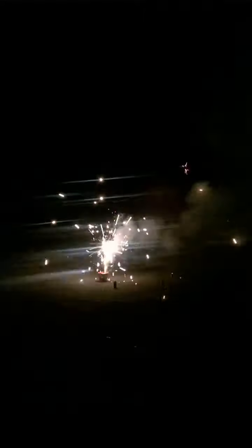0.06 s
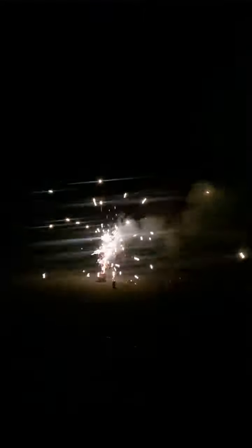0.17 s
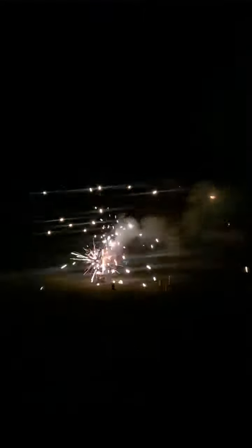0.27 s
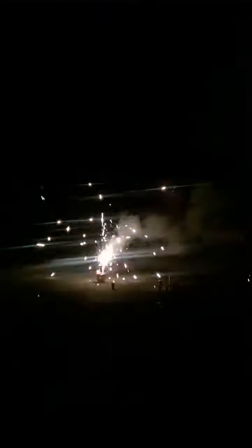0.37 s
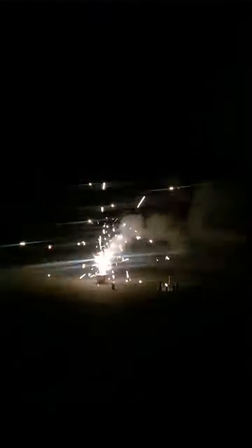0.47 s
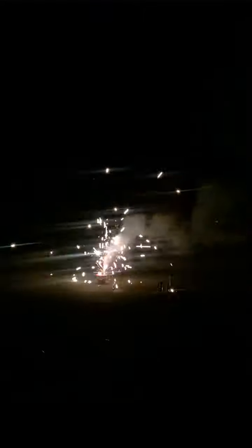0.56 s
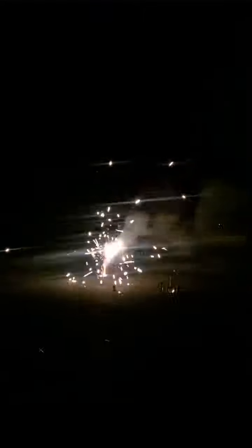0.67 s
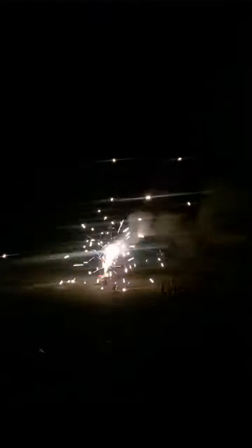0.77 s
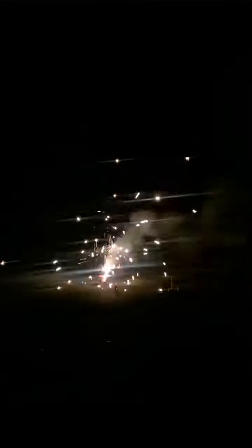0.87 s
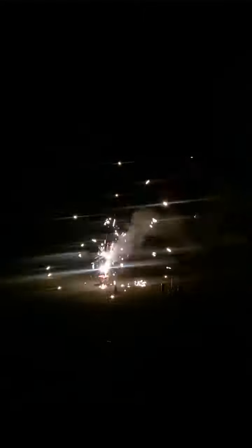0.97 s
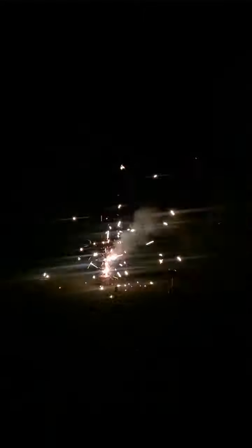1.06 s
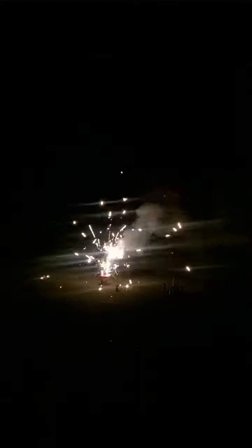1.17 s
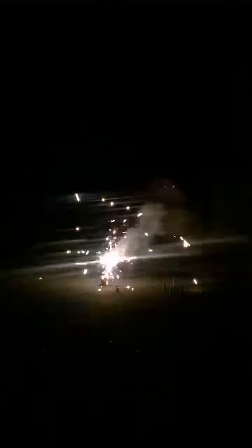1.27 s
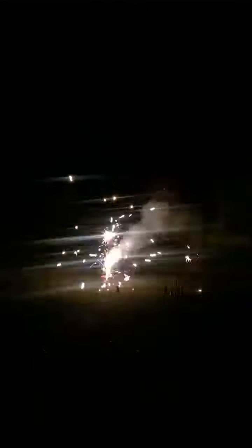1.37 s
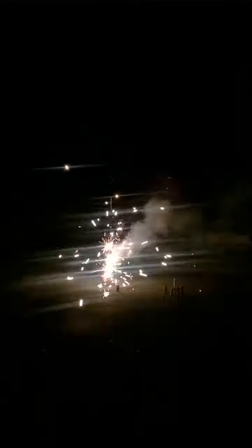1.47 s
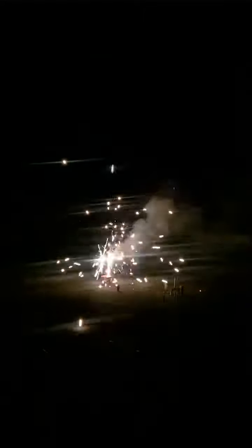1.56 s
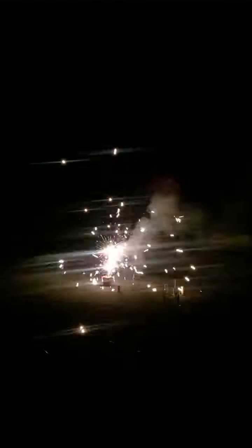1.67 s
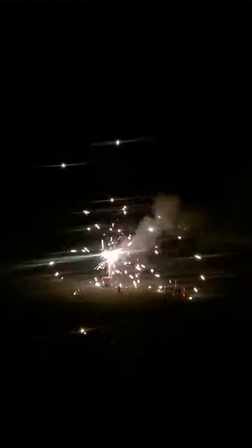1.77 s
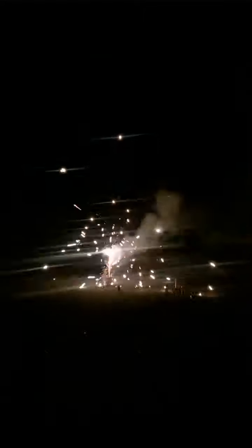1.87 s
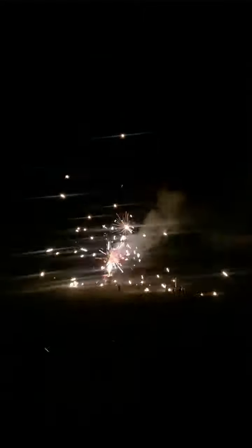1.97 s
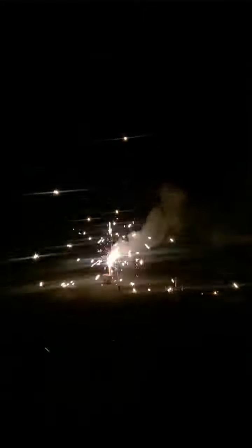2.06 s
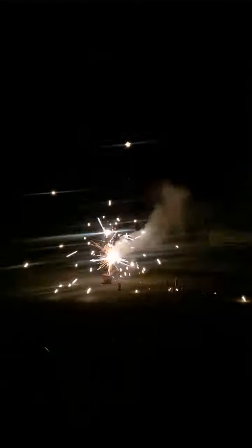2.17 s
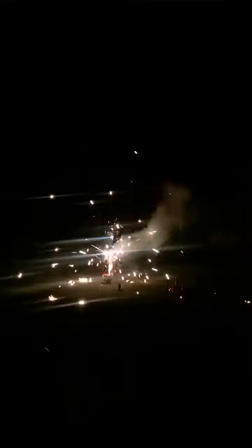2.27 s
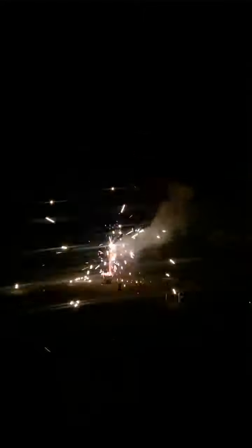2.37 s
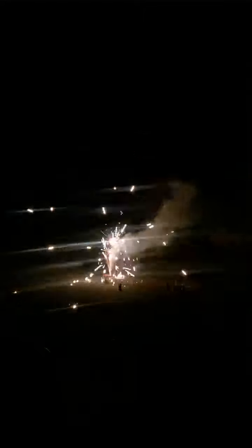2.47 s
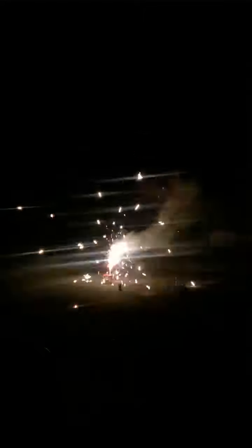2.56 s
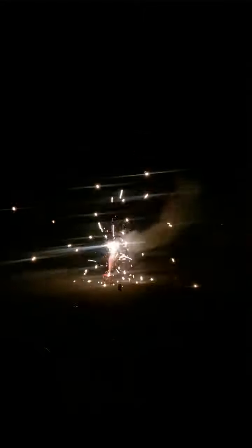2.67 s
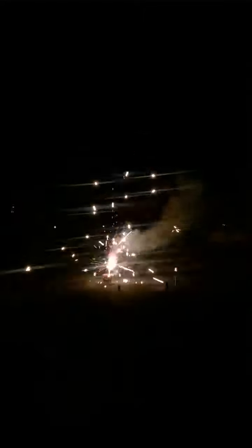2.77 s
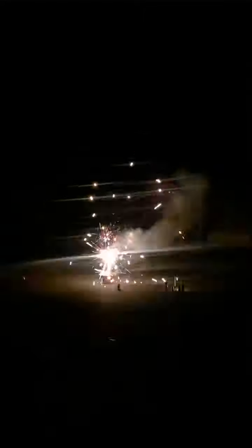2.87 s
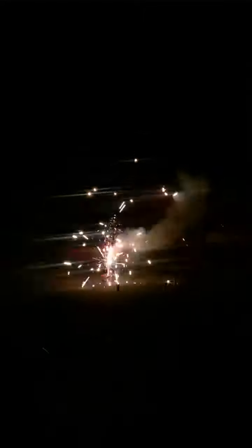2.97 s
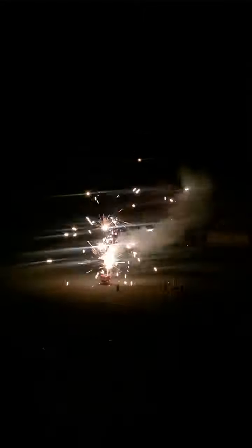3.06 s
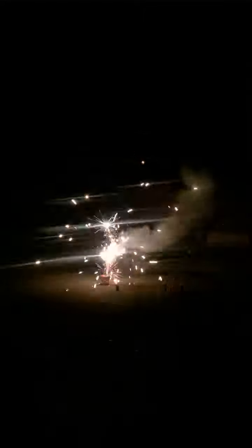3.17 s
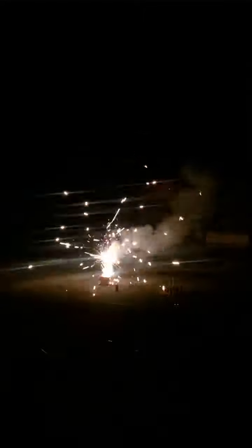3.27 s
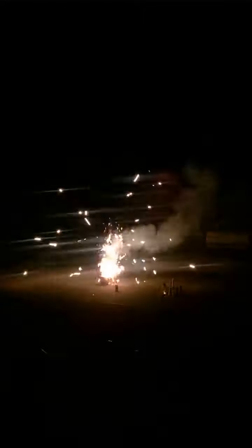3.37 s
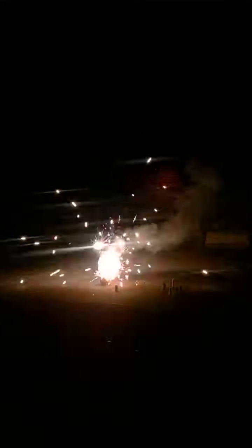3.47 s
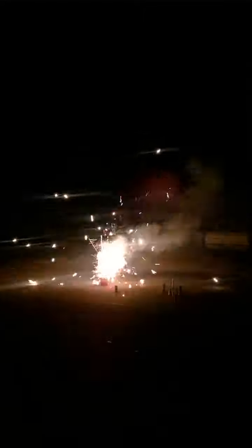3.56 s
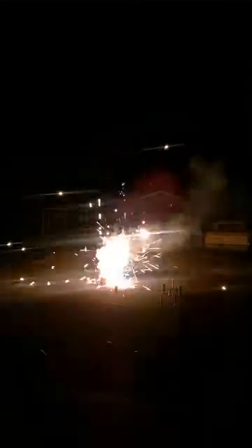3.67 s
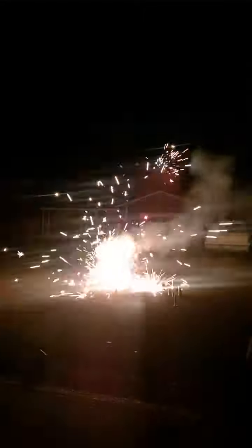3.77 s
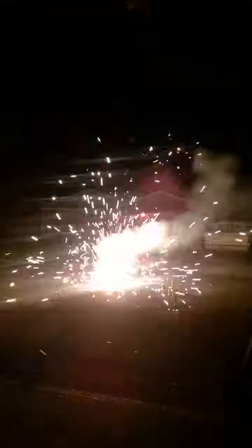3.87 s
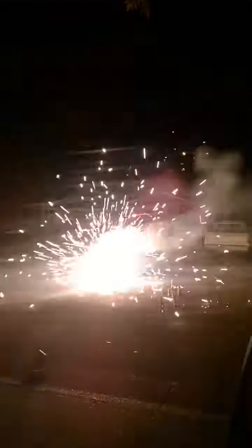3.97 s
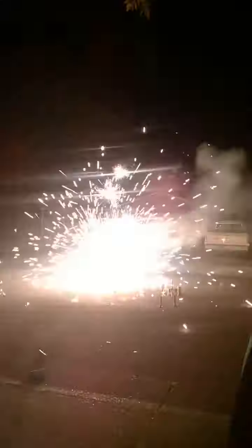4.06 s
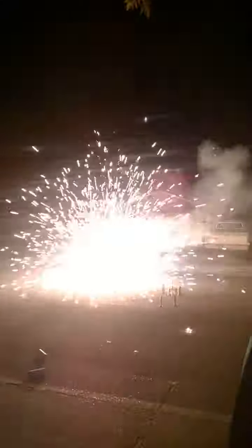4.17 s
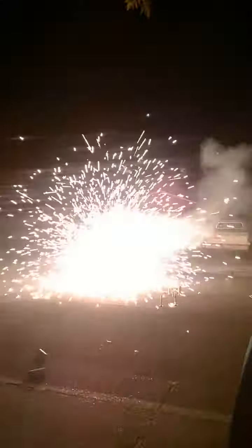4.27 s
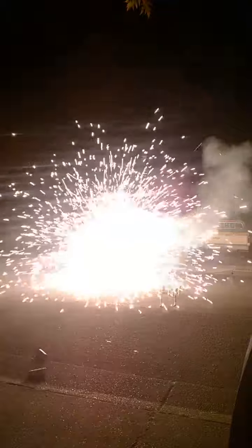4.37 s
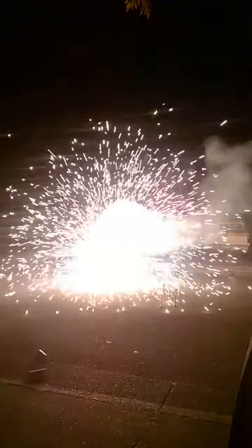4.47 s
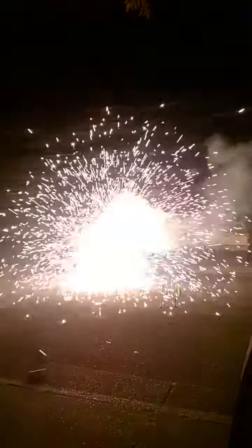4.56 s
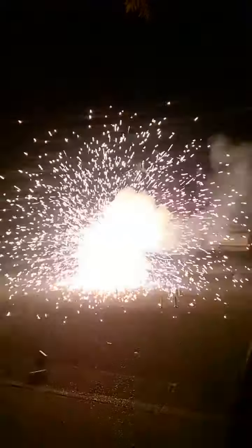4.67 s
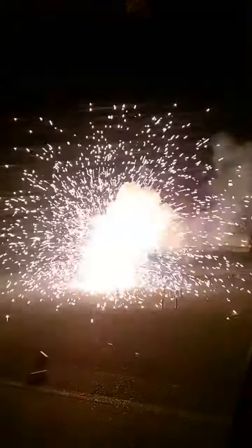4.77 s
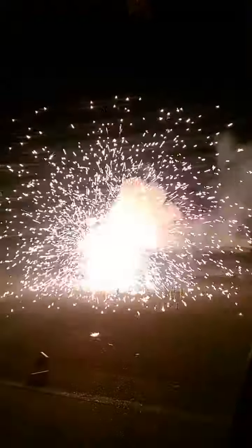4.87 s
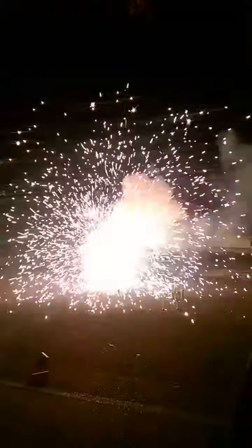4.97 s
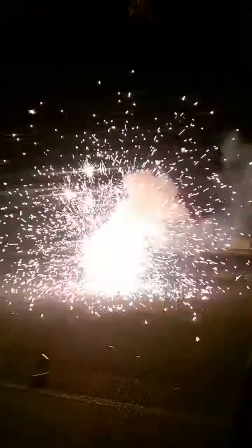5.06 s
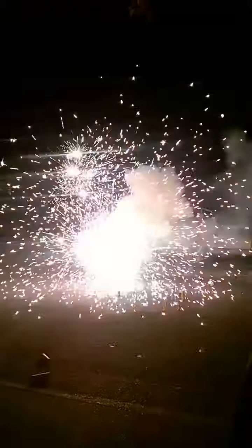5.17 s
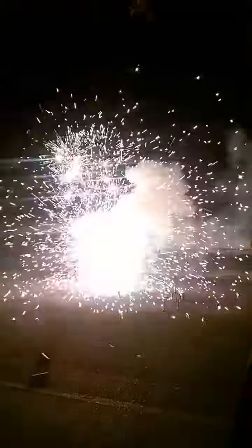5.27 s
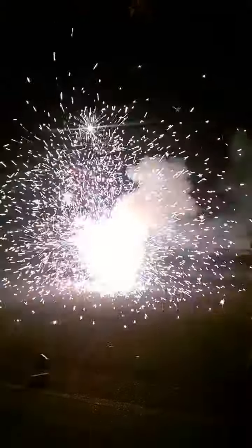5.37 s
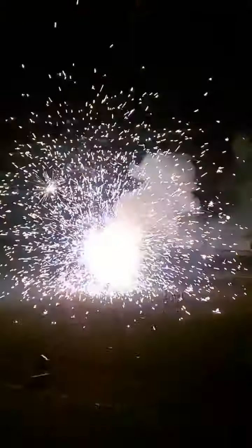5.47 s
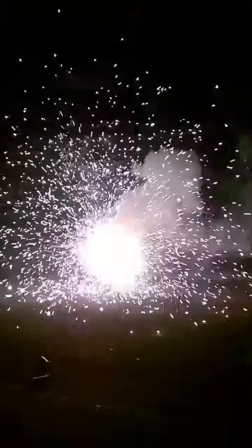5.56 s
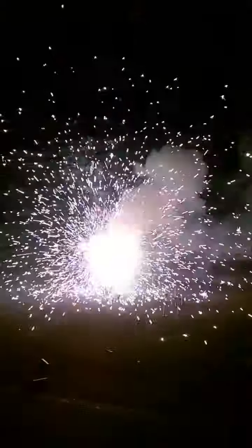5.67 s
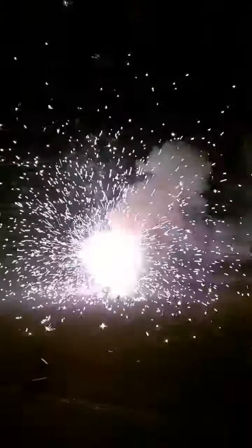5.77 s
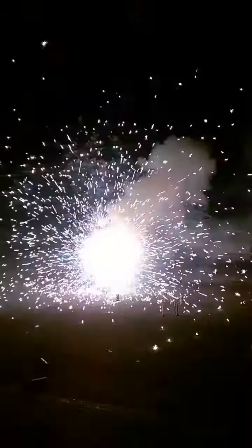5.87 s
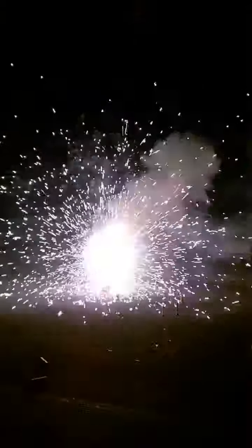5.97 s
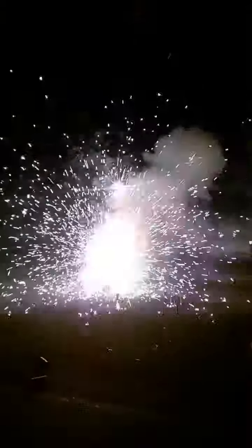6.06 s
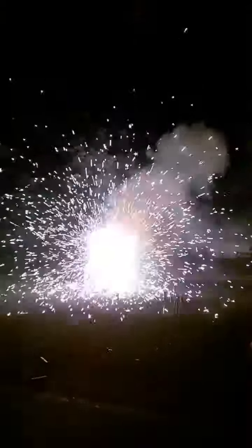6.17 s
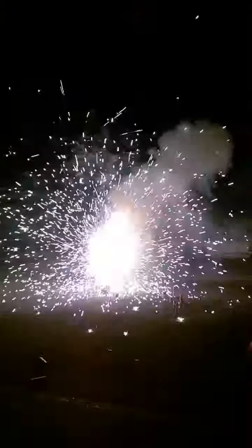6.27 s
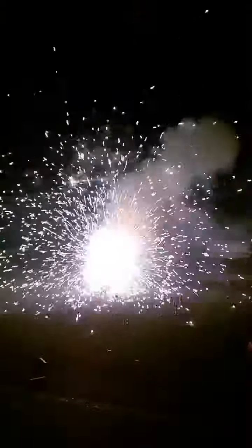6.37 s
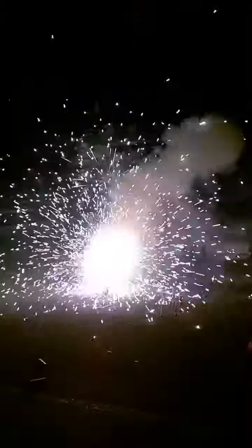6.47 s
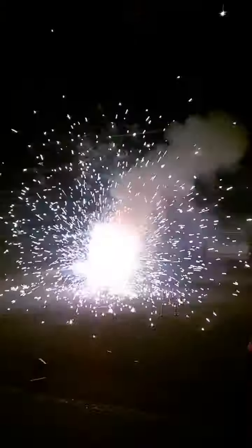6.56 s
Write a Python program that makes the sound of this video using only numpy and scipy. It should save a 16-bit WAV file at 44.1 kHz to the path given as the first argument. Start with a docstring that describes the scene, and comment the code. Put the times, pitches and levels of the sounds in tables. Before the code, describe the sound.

Sharp resonant spark cracks snap in an open paved yard, one dull distant thump early, before erupting into continuous, bright, hissing crackle.

```python
"""A paved yard at night, where a ground fountain firework burns some metres away.
Its sparks burst in dry, resonant pops: first sputtering, then a dense crackling shower over the rush of the jet.
How hard the powder burns sets the number and size of the small sparks and the strength of the noise jet.
Smaller pops and weaker burning are brighter; each pop has a short treble splash and scatters as hissing noise.
One dull, resonant thump with two echoes comes from farther off, over a low rumble of open air."""
import sys
import numpy as np
from scipy import signal
from scipy.fft import rfft, irfft
from scipy.io import wavfile
from scipy.ndimage import uniform_filter1d

SR = 44100
rng = np.random.default_rng(int(sys.argv[2]) if len(sys.argv) > 2 else 0)


def int16_out(signal):
    """Quantize to a 16-bit WAV file."""
    q = np.round(np.clip(np.atleast_2d(signal).T, -1, 1) * 32767)
    wavfile.write(sys.argv[1], SR, q.astype(np.int16))


N = 291942
T = np.arange(N) / SR
POP_S = 0.003   # length over which a pop's level counts
KNOCK_SPREAD_DB = 1.7   # chance spread of the knock in small sparks and fragments


def from_db(db):
    """Decibels to gain."""
    return 10 ** (np.asarray(db) / 20)


def unit_energy(x):
    """Scale so that the squares sum to one."""
    return x / np.sqrt(np.sum(x ** 2) + 1e-20)


def through(x, response):
    """Pass a sound through an impulse response."""
    return signal.oaconvolve(x, response)[:N]


def clicks(times, sizes):
    """One impulse of each size at its time."""
    samples = np.clip(times * SR, 0, N).astype(int)
    return np.bincount(samples, sizes, N + 1)[:N]


def noise(spectrum, size):
    """Noise of rms 1 with a given spectrum, rolled off below its first frequency."""
    hz, level_db = np.transpose(spectrum)
    bins = np.maximum(np.fft.rfftfreq(size, 1 / SR), 1)
    gain = from_db(np.interp(np.log(bins), np.log(hz), level_db))
    gain = gain * np.minimum(bins / hz[0], 1)
    shaped = irfft(rfft(rng.standard_normal(size)) * gain, size)
    return unit_energy(shaped) * np.sqrt(size)


def resonances(modes, size, pitch=1):
    """Impulse response of parallel resonances with alternating signs, all shifted by a pitch ratio."""
    out, impulse = 0, signal.unit_impulse(size)
    for k, (hz, width_hz, level_db) in enumerate(modes):
        radius = np.exp(-np.pi * width_hz / SR)   # a wider resonance dies faster
        angle = 2 * np.pi * hz * pitch / SR
        ring = signal.lfilter([1, 0, -1], [1, -2 * radius * np.cos(angle), radius ** 2], impulse)
        out = out + (-1) ** k * from_db(level_db) * (1 - radius ** 2) * ring
    return unit_energy(out)


def diffuse(times, sizes, power_shape, spectrum):
    """Every spark bursts at a new place, so each scatters into fresh noise under the same power envelope."""
    power = through(clicks(times, sizes ** 2), power_shape / power_shape.sum())
    return np.sqrt(np.maximum(power, 0)) * noise(spectrum, size=N)


def vigour(times):
    """How hard the powder burns at these times, in dB against full spray."""
    # how hard the powder burns, as the level of the fine crackle: (time [s], level [dB])
    burn_curve = [(0.0, -38), (0.37, -40), (1.01, -35), (2.04, -37), (2.34, -34), (2.73, -37),
                  (3.24, -33.5), (3.63, -36), (3.72, -33.5), (3.93, -21), (4.07, -18.5), (4.31, -18),
                  (4.81, -17.5), (5.22, -17.5), (5.49, -17.5), (6.62, -19.5)]
    full_burn_db = -18   # the fountain in full spray
    s, level_db = np.transpose(burn_curve)
    return np.interp(times, s, level_db) - full_burn_db


def night_air(level_db):
    """Steady noise makes the low rumble of the open air."""
    # spectrum of the rumble: (frequency [Hz], relative density [dB])
    rumble_spectrum = [(30, -17), (90, -1), (200, -1.5), (800, -21), (6000, -55)]
    return from_db(level_db) * noise(rumble_spectrum, size=N)


def thump(top_hz, tail_db, tail_t60):
    """A far, muffled report with two echoes and a short tail; distance has taken its treble."""
    # the dull thump and its echoes: (time [s], level [dB])
    arrivals = [(0.312, -8), (0.3428, -19), (0.3766, -27)]
    # what the thump rings with: (frequency [Hz], width [Hz], level [dB])
    thump_modes = [(158, 59, 2), (297, 200, -4), (440, 72, 0), (635, 83, -6)]
    s, level_db = np.transpose(arrivals)
    muffle = signal.butter(8, top_hz, fs=SR, output="sos")
    boom = signal.sosfilt(muffle, resonances(thump_modes, size=8192))
    direct = through(clicks(s, from_db(level_db)), boom / np.abs(boom).max())
    tail = unit_energy(rng.standard_normal(SR) * from_db(-60 * T[:SR] / tail_t60))
    return direct + from_db(tail_db) * through(direct, tail)


def jet(flutter_db):
    """Gas rushes from the tube as noise and flutters as the powder burns."""
    # spectrum of the rushing gas: (frequency [Hz], relative density [dB])
    rush_spectrum = [(25, -57), (50, -14), (80, -11), (150, -2), (300, -2), (600, -9.5), (1500, -30),
                     (4000, -3), (7000, -5), (15500, -48)]
    full_burn_jet_db, follows = -27.5, 0.99   # level before flutter; dB gained per dB of burn
    flutter = noise([(2, 0), (20, -3), (60, -18), (300, -70)], size=N)
    level_db = full_burn_jet_db + follows * vigour(T) + flutter_db * flutter
    return from_db(level_db) * noise(rush_spectrum, size=N)


def yard(times, sizes, spectrum, build_s, t60, far_db, far_t60, grain_db):
    """Ground, walls and leaves return a finely grained tail: a quick build, a fast decay and a weaker slow one."""
    age = T[:SR]
    fade = np.hypot(from_db(-60 * age / t60), from_db(far_db - 60 * age / far_t60))
    build = 1 - np.exp(-age / build_s)
    grain = noise([(30, 0), (600, 0), (3000, -40)], size=N)
    return diffuse(times, sizes, (fade * build) ** 2, spectrum) * from_db(grain_db * grain)


def scattered_cracks(times, crack):
    """The yard returns the body of the cracks almost at once, with a longer faint tail."""
    # spectrum of the scattered cracks: (frequency [Hz], relative density [dB])
    scatter_spectrum = [(60, -18), (160, -4), (330, -3), (500, -3), (870, -2), (1210, -5.5), (1400, 0),
                        (1660, 4), (2020, -3), (2450, 1), (3150, -0.5), (3700, -4), (5000, -33.5)]
    return yard(times, crack, scatter_spectrum, build_s=0.00014, t60=0.19,
                far_db=-9.5, far_t60=0.9, grain_db=2.5)


def scattered_treble(times, treble):
    """The yard returns the treble as a bright hiss that swells more slowly than the scattered cracks."""
    # spectrum of the scattered treble: (frequency [Hz], relative density [dB])
    sizzle_spectrum = [(1500, -40), (2600, -30), (3700, -5), (4600, -1.5), (5400, 1), (7200, 0), (8800, -3),
                       (10200, -9.5), (12500, -14.5), (15500, -29)]
    return yard(times, treble, sizzle_spectrum, build_s=0.015, t60=0.21,
                far_db=-40, far_t60=0.68, grain_db=-0.2)


def splash(times, treble, delay_s, spread):
    """A short splash of treble noise follows each crack by a millisecond or two."""
    # spectrum of the treble splash: (frequency [Hz], relative density [dB])
    splash_spectrum = [(2500, -11.5), (3700, -10.5), (4600, -1.5), (5500, -2), (7200, 2.5), (8800, -2.5),
                       (10200, -8.5), (12500, -18.5), (15500, -38)]
    swell = np.exp(-(np.log(T[1:SR // 50] / delay_s) / spread) ** 2 / 2)
    return diffuse(times, treble, swell, splash_spectrum)


def small_sparks():
    """Times, sizes and knocks of the small pops: random, and more and louder the harder the powder burns."""
    swarm_per_s, swarm_db = 680, -19   # rate and joint size at full burn, before the pops are coloured
    rate_follows, swarm_follows = 0.9, 1.505   # dB that each gains per dB of burn
    size_spread_db, surge_db = 3, 0.16   # differences in size; slow surges of the spray
    knock_db = 3.5   # middle of the knock lift
    chance, burn_db = rng.random(N), vigour(T)
    size_luck, knock_luck = rng.standard_normal((2, N))
    surge = noise([(2, 0), (8, 0), (30, -40), (300, -120)], size=N)
    per_s = swarm_per_s * from_db(rate_follows * burn_db)
    born = chance < per_s / SR
    size = born * from_db(size_spread_db * np.minimum(size_luck, 2))
    # the powder burns evenly, so the power is steadied over a fortieth of a second
    power = uniform_filter1d(size ** 2, size=SR // 40)
    evened = size / np.sqrt(np.maximum(power, per_s / SR))
    size = evened * from_db(swarm_db + swarm_follows * burn_db + surge_db * surge)
    return T[born], size[born], knock_db + KNOCK_SPREAD_DB * knock_luck[born]


def loud_sparks(gain_db):
    """Times, sizes and knocks of the big pops."""
    # the big sparks bursting, before the shared gain: (time [s], level [dB], knock lift [dB])
    big_pops = [(0.01, -24.5, 5.5), (0.0687, -30, 8.5), (0.0807, -23, 8), (0.0904, -32, 11),
                (0.1039, -20.5, 1), (0.1646, -23.5, 8), (0.1716, -26, 6), (0.2646, -29, 6.5),
                (0.331, -19.5, 1.5), (0.3417, -22, 0), (0.373, -25.5, 5), (0.45, -25, 1),
                (0.4621, -26.5, -12), (0.5583, -23.5, -3), (0.5664, -33.0, 12), (0.5799, -19.5, 6.5),
                (0.6013, -29.5, 5.5), (0.6701, -23, 8), (0.7028, -20.5, 4), (0.757, -23, 4),
                (0.7727, -29, 7), (0.8282, -27.0, 2), (0.8697, -27, 2.5), (0.8958, -24.5, 7.5),
                (0.9336, -25.5, 6), (0.9648, -32, 12), (0.9872, -21, 5.5), (1.0317, -24.5, 3),
                (1.0638, -25, 8.5), (1.0726, -24.5, 1), (1.1069, -24, 8), (1.1188, -16.5, 7.5),
                (1.126, -25.5, 5), (1.1707, -24, 1), (1.2292, -28, 6), (1.303, -24, 4.5), (1.313, -27, 1),
                (1.3468, -22.5, -14), (1.3618, -24.5, 0), (1.3721, -28, 9), (1.3808, -28, 9),
                (1.409, -24, 0), (1.4292, -28, 6), (1.4569, -28, -3), (1.4616, -25, 4), (1.491, -26.0, 2),
                (1.51, -25.0, 8), (1.549, -26, 7), (1.5531, -26, 8.5), (1.5853, -28, -9), (1.618, -33, 9),
                (1.6456, -23.5, 6.5), (1.734, -24, 0), (1.7522, -24, 6.5), (1.7605, -23, 8.5),
                (1.8127, -24, -8), (1.8307, -28, 3), (1.8656, -23.5, 6), (1.9166, -27.5, 9.5),
                (1.9394, -30, 8), (1.9627, -28.5, 6), (1.9964, -32.5, 3), (2.046, -32.5, 4),
                (2.0655, -41, 19), (2.0826, -28.5, 0), (2.1015, -27, 6), (2.136, -25, -6),
                (2.1483, -30.5, 12), (2.1824, -20.5, 5), (2.2095, -26, 7), (2.2397, -22.5, 7),
                (2.268, -28, 6), (2.3012, -19, 3), (2.3119, -23.5, 8), (2.3556, -25, 8), (2.3695, -24.5, 5),
                (2.3945, -21, 3), (2.414, -29.5, 1), (2.4888, -26.0, 6.5), (2.52, -30.5, 7),
                (2.553, -23.5, 7), (2.5727, -25, 2), (2.591, -22.5, 5), (2.6047, -27.5, 8),
                (2.6539, -21.5, 4), (2.6589, -24, 2), (2.693, -22, 6), (2.7664, -20.5, 3),
                (2.8058, -33, 15), (2.8243, -25.5, -1), (2.8472, -28, 11), (2.9035, -34, 9),
                (2.916, -21, 5), (2.9304, -26.0, 3), (2.945, -19, 6.5), (2.9833, -22, 5),
                (3.0221, -16.5, 7.5), (3.109, -23, 4), (3.1306, -24, -2), (3.143, -24.5, -1),
                (3.163, -22.5, 5), (3.1712, -23, -11), (3.2251, -24, 6.5), (3.2507, -24, 5),
                (3.2668, -26.5, 7), (3.28, -24.5, 6), (3.3325, -19.5, 6.5), (3.3548, -26, 8),
                (3.3735, -24.5, 0), (3.3887, -24.5, 7), (3.3998, -17.5, 5), (3.41, -25, 9),
                (3.4163, -22, 9), (3.474, -27, 9.5), (3.548, -27, 0), (3.5888, -25, 6.5), (3.6267, -25, 7),
                (3.642, -21.5, -1), (3.7075, -19.5, 7), (3.734, -24, 5), (3.7508, -19.5, 5),
                (3.7594, -15, 4), (3.7786, -15, 4), (3.7897, -13.5, 5.5), (3.8226, -17.5, 6),
                (3.8391, -14, 0), (3.8637, -11.5, 1), (3.8814, -14.5, 5), (3.8912, -24, 13),
                (3.9243, -22, 9), (3.9465, -21, 9), (3.9623, -13.5, 6)]
    s, level_db, knock_db = np.transpose(big_pops)
    return s, from_db(level_db + gain_db) * np.sqrt(POP_S * SR), knock_db


def fragments(times, sizes, count=2):
    """Each big spark throws off pieces that burst just after it, more weakly."""
    first_s, last_s = 0.006, 0.05   # they burst within this time after their parent
    base_db, spread_db = -12, 2.5   # size against the parent, before chance
    knock_db = 2.5   # less than the small sparks
    late, size_luck, knock_luck = rng.random((len(times) * count, 3)).T
    piece_s = np.repeat(times, count) + first_s + (last_s - first_s) * late
    piece_db = base_db + spread_db * (2 * size_luck - 1.5)
    piece_size = np.repeat(sizes, count) * from_db(piece_db)
    return piece_s, piece_size, knock_db + KNOCK_SPREAD_DB * (2 * knock_luck - 1)


def coloured(times, sizes, knock_db, puff_db, bright_db=0):
    """Times with puff, crack, knock and treble sizes: the smaller the pop and the weaker the burn, the brighter."""
    typical_pop_db = -23   # a pop of this level has the base treble at full burn
    base_treble_db, treble_spread_db = -2.0, 2   # treble against crack before the mix; chance spread
    loss_per_db, smoulder_brightens = 0.2021, 0.18   # dB lost per dB of size; dB gained per dB below full burn
    treble_luck = np.clip(rng.standard_normal(len(times)), -2, 2)
    bigger_db = 20 * np.log10(sizes / np.sqrt(POP_S * SR)) - typical_pop_db
    treble_db = base_treble_db - loss_per_db * bigger_db
    treble_db = treble_db - smoulder_brightens * vigour(times) + treble_spread_db * treble_luck
    puff, knock = sizes * from_db(puff_db), sizes * from_db(knock_db)
    return times, puff, sizes, knock, sizes * from_db(treble_db + bright_db)


def pop_parts(puff, crack, knock, treble):
    """The four resonant parts of a pop, each as modes, mixed sizes and lag in seconds."""
    # modes ahead of each spark's pitch shift, all with columns (frequency [Hz], width [Hz], level [dB]):
    # the puff of gas
    puff_modes = [(97, 76, -11), (184, 81, -1), (344, 84, -0.5)]
    # resonances that colour every crack
    crack_modes = [(623, 183, 1), (848, 117, 2.5), (1140, 117, 0.5), (1668, 103, 4), (3152, 350, 3.5)]
    # the hard knock that some pops have more of
    knock_modes = [(2449, 243, 1), (2910, 505, -2.5)]
    # the bright snap
    snap_modes = [(5800, 930, 3), (6770, 1250, -6), (11800, 1500, -11)]
    snap_late_s = 0.0011   # the brightest part of a pop trails its crack
    return [(puff_modes, puff * from_db(-13.0), 0),
            (crack_modes, crack * from_db(-1.0), 0),
            (knock_modes, knock * from_db(-7.0), 0),
            (snap_modes, treble * from_db(-6.0), snap_late_s)]


def cracks(times, parts, bounce_s, bounce_spread, bounce_db, pitch_spread, count=4):
    """Each pop rings twice, straight and off the ground; a chance lag stands for the height of the spark."""
    bounced = times + bounce_s * np.exp(bounce_spread * rng.standard_normal(len(times)))
    # sparks differ in size, so each is dealt a slightly higher or lower ring
    pitches = np.exp(pitch_spread * np.linspace(-1, 1, count))
    dealt = rng.integers(0, count, len(times))
    out = 0
    for modes, sizes, late_s in parts:
        for k, pitch in enumerate(pitches):
            own = sizes * (dealt == k)
            straight = clicks(times + late_s, own)
            off_ground = clicks(bounced + late_s, own * from_db(bounce_db))
            out = out + through(straight + off_ground, resonances(modes, size=2048, pitch=pitch))
    return out


def scene():
    """Pops with their splash and scatter, over the jet, the thump and the night air."""
    pop_s, pop_size, pop_knock_db = loud_sparks(gain_db=0.07)
    big = coloured(pop_s, pop_size, pop_knock_db, puff_db=0.5)
    # fragments fizz more brightly
    pieces = coloured(*fragments(pop_s, pop_size), puff_db=1.0, bright_db=2.0)
    small = coloured(*small_sparks(), puff_db=-2.5)   # small sparks push less gas
    times, puff, crack, knock, treble = np.hstack([big, pieces, small])

    out = night_air(level_db=-52.5)
    out += thump(top_hz=730, tail_db=-11.5, tail_t60=0.55)
    out += jet(flutter_db=3.5)
    out += from_db(-4.5) * scattered_cracks(times, crack)
    out += from_db(-0.5) * scattered_treble(times, treble)
    out += from_db(-0.5) * splash(times, treble, delay_s=0.0017, spread=0.4)
    out += cracks(times, pop_parts(puff, crack, knock, treble), bounce_s=0.000773,
                  bounce_spread=0.1, bounce_db=-4.5, pitch_spread=0.045)
    return out[None]


def record(dry):
    """The loudest peaks are rounded; a small microphone thins the deep bass, and the top is cut."""
    ceiling, bass_hz, top_hz = 0.66, 60, 15800
    rounded = dry / (1 + (dry / ceiling) ** 6) ** (1 / 6)
    bass_cut = signal.butter(2, bass_hz, "high", fs=SR, output="sos")
    top_cut = signal.ellip(12, 0.1, 90, top_hz, fs=SR, output="sos")
    thinned = signal.sosfilt(bass_cut, rounded)
    return signal.sosfilt(top_cut, thinned)


dry = scene()
out = record(dry)
int16_out(out)
```